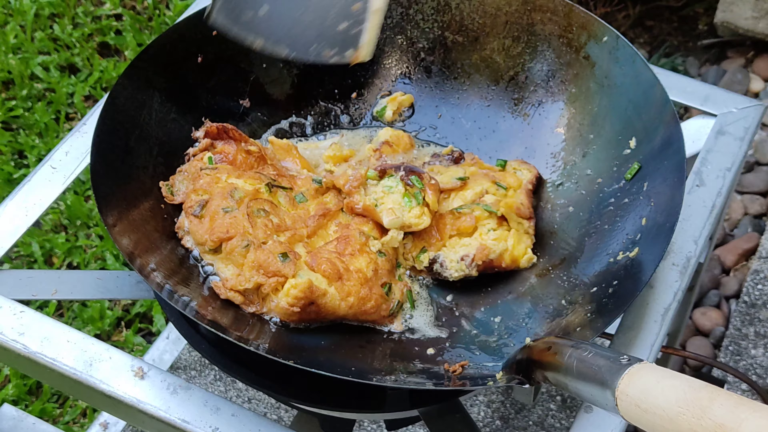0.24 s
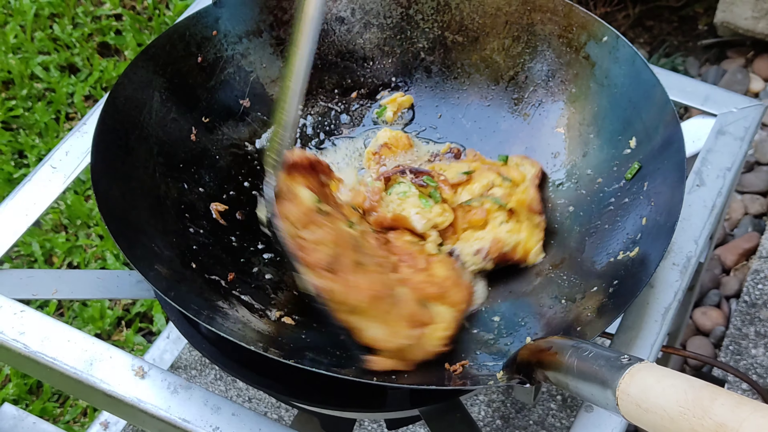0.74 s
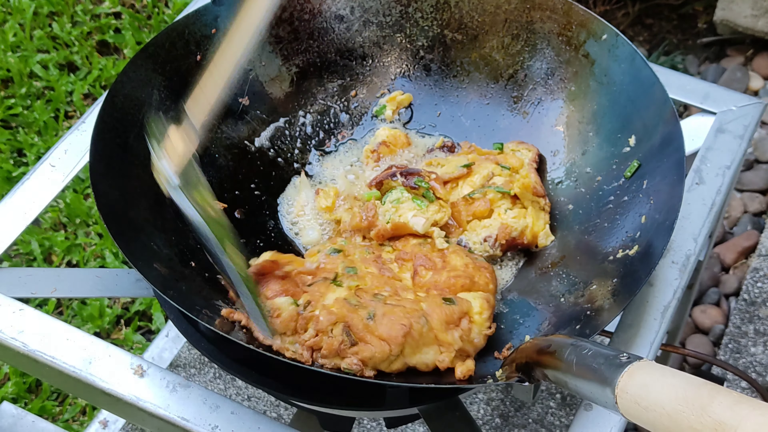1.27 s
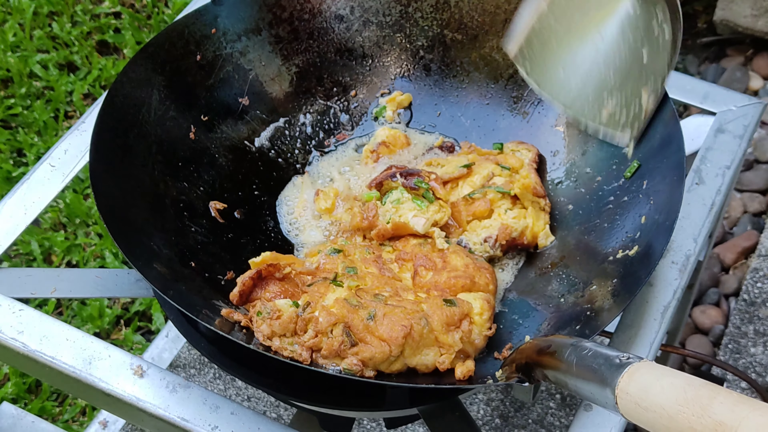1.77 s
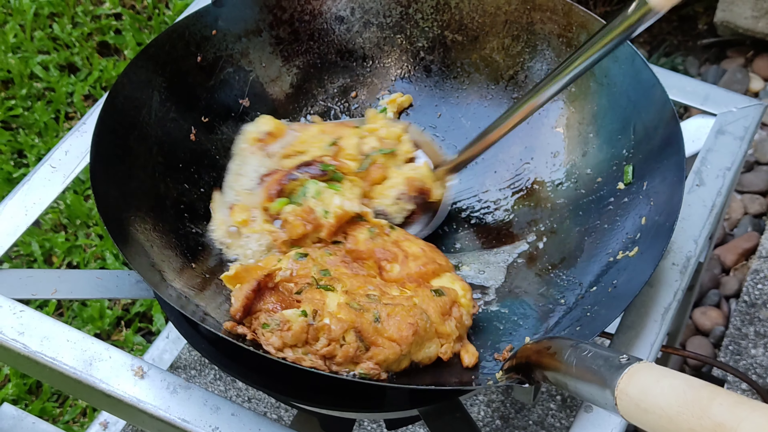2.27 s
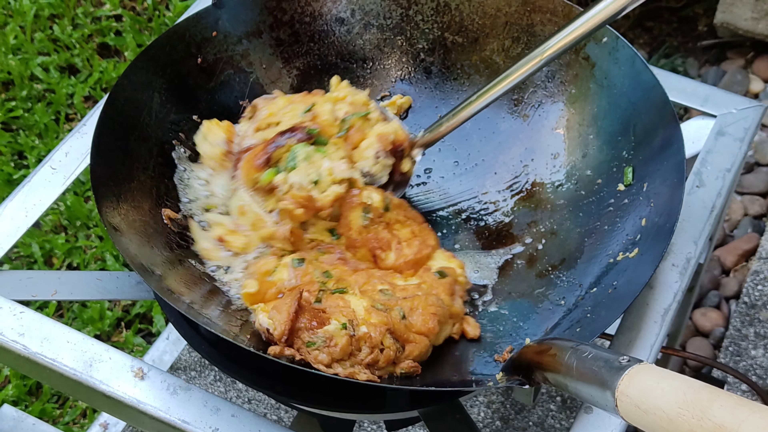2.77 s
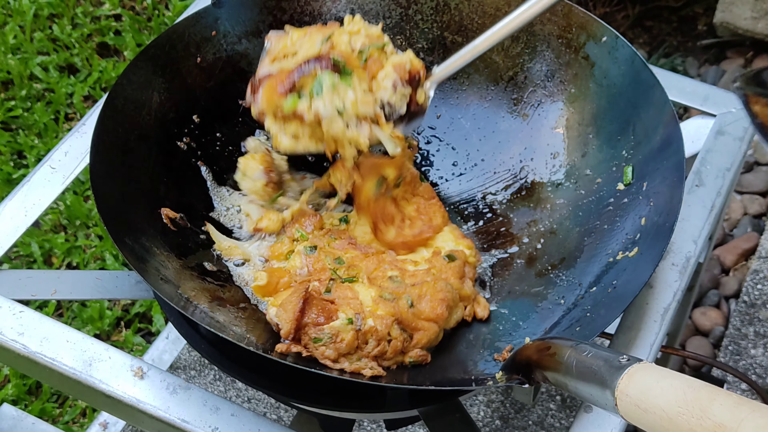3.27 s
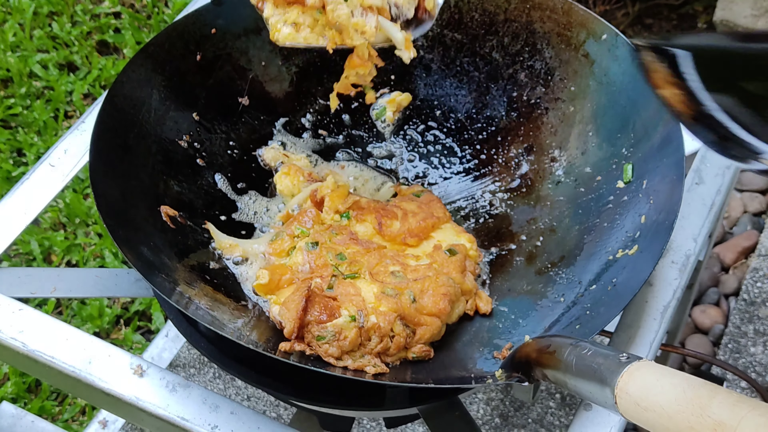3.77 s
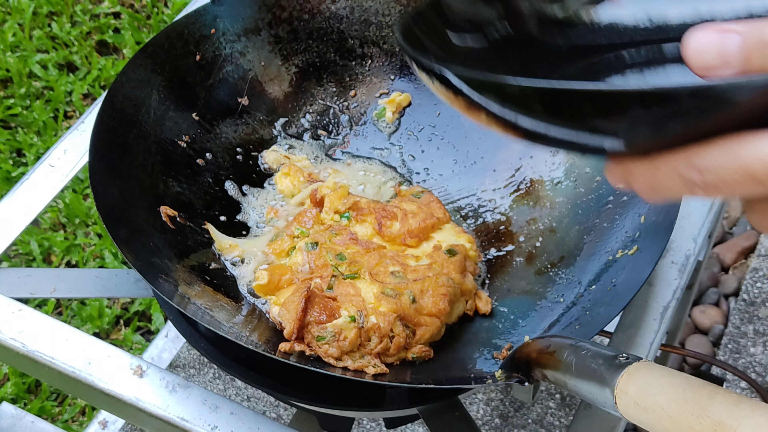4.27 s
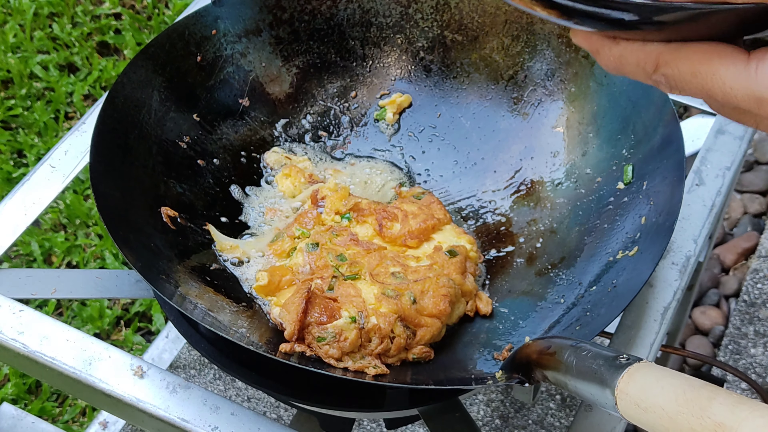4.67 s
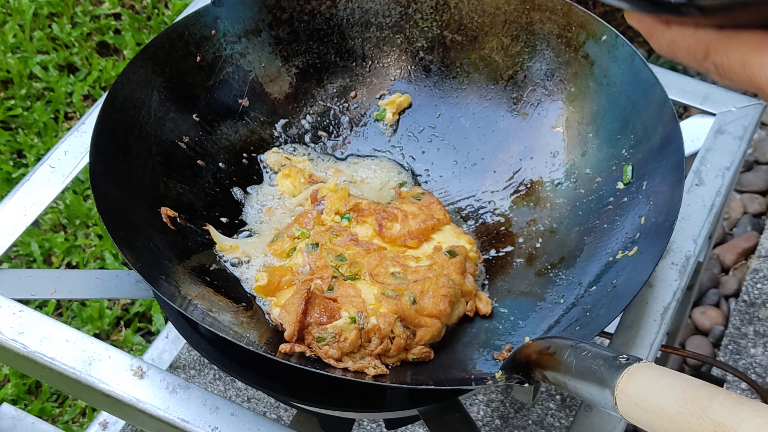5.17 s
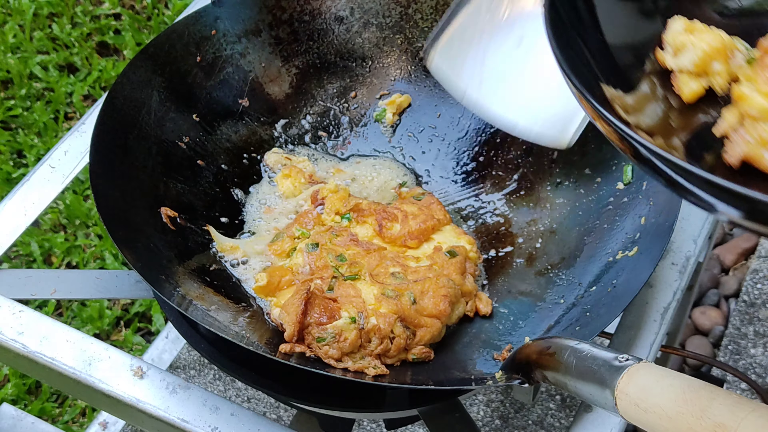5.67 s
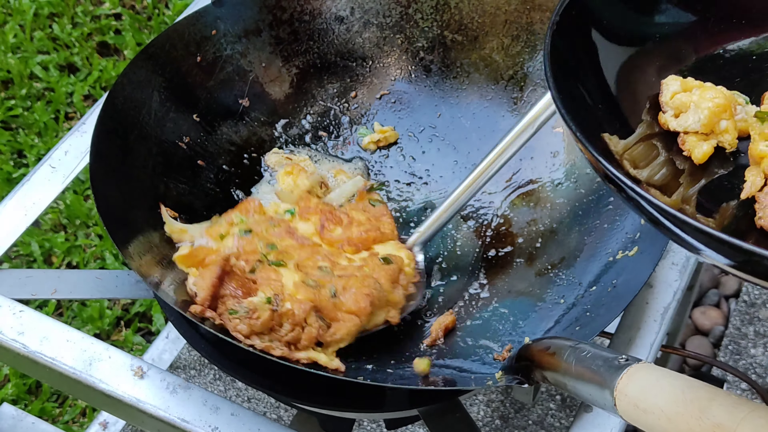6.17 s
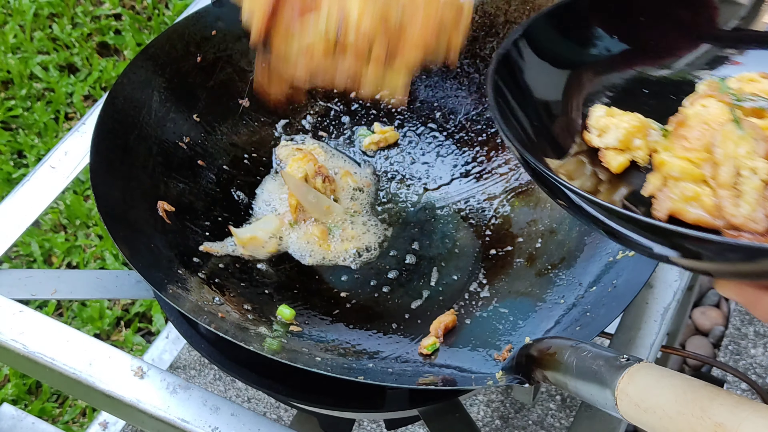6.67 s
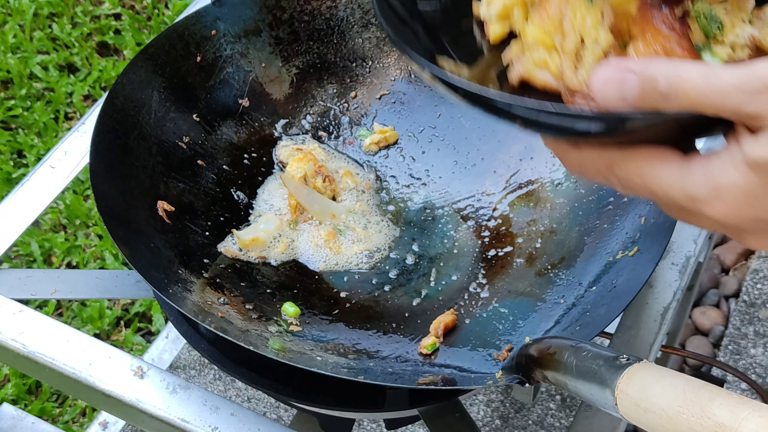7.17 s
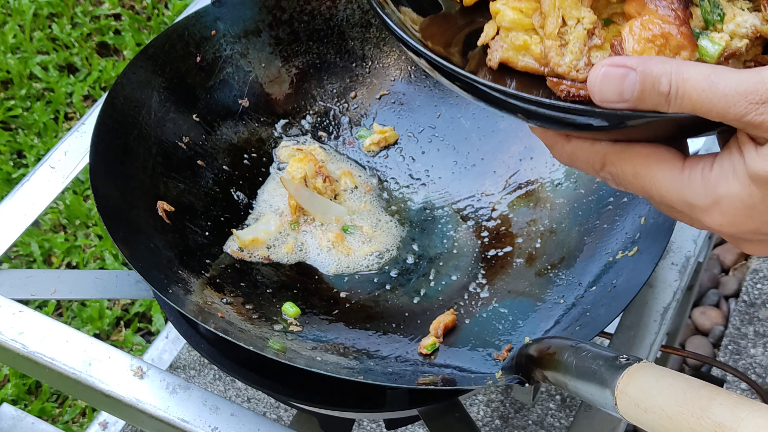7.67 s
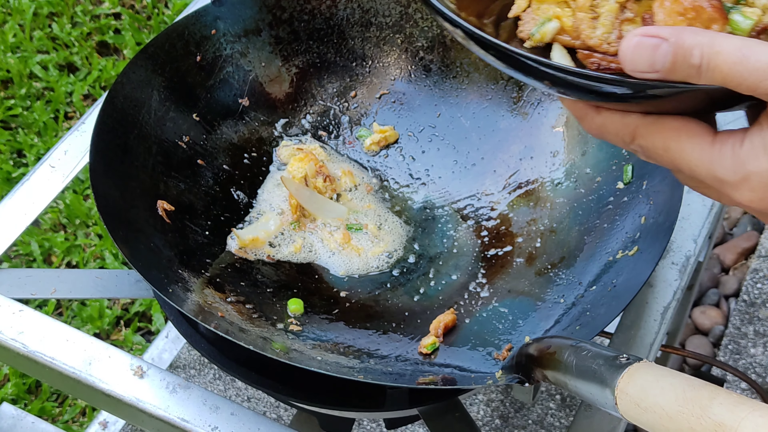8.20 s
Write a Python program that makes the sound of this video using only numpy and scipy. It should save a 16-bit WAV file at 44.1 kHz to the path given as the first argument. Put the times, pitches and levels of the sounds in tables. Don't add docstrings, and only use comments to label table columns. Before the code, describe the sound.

Bright metallic scrapes and cracks in a hollow steel wok come in bursts, separated by pauses of fine oil sizzle. Crisp pops cluster midway; a bowl is tapped twice, one tap ringing. After a distant faint chirp, the spatula clatters and scrapes again, and a final tap follows. Recorded close outdoors in stereo, with low, fluttering wind bumping the left channel, softly overloaded, and a thin, slightly dulled top end.

```python
import sys
import numpy as np
from scipy import signal
from scipy.fft import rfft, irfft, next_fast_len
from scipy.io import wavfile
from scipy.ndimage import uniform_filter1d, map_coordinates

SR = 44100
rng = np.random.default_rng(int(sys.argv[2]) if len(sys.argv) > 2 else 0)


def to_wav(s):
    ch = np.atleast_2d(s).T
    pcm = np.round(np.clip(ch, -1, 1) * 32767)
    wavfile.write(sys.argv[1], SR, pcm.astype(np.int16))


def voltage_ratio(level):
    return 10 ** (np.asarray(level, float) / 20)


N = 372200

# pitch in Hz, level in dB per Hz.
STEEL = [(710, -52), (1200, -28), (1410, -24.5), (1640, -7), (2360, -9.5), (3180, -5.5), (3770, -5),
         (5980, -4), (6510, -6), (8880, -0.5), (11500, -25.5), (12500, -18), (13600, -30), (15000, -24),
         (15600, -38)]
GRIPS = [
    0,
    1.7,
    2.37,
    4.5,
]


def unit(x):
    return x / np.sqrt(np.mean(x ** 2, axis=-1, keepdims=True) + 1e-20)


def along(points, hz):
    f, v = np.transpose(points)
    return np.interp(np.log(hz + 1), np.log(f + 1), v)


def curves(rows):
    s, *cols = np.transpose(rows)
    return [np.interp(np.arange(N) / SR, s, c) for c in cols]


def wobble(rate):
    knots = rng.standard_normal(int(N * rate / SR) + 4)
    return map_coordinates(knots, [np.arange(N) * rate / SR])


def hump(s, rise, hold, fall):
    out, corners = np.zeros(N), np.cumsum([s, rise, hold, fall])
    span = np.arange(max(int(corners[0] * SR), 0), min(int(corners[-1] * SR), N))
    out[span] = np.interp(span / SR, corners, [0, 1, 1, 0])
    return out


def filtered(x, response):
    m = next_fast_len(x.shape[-1] + 8192)
    return irfft(rfft(x, m) * response(np.fft.rfftfreq(m, 1 / SR)), m)[..., :x.shape[-1]]


def noise(spectrum, channels=1):
    white = rng.standard_normal((channels, N))
    return unit(filtered(white, lambda hz: voltage_ratio(along(spectrum, hz))))


def pan(db):
    return voltage_ratio([[db / 2], [-db / 2]])


def add(out, s, x):
    start = round(s * SR)
    x = x[..., max(-start, 0):N - start]
    first = max(start, 0)
    out[..., first:start + x.shape[-1] + max(-start, 0)] += x


def resonances(modes, hz, scatter):
    seen = 1 + scatter * rng.normal(0, 1, (len(modes), 2, 1))
    total = 0
    for k, (center, width, db) in enumerate(modes):
        peak = 1j * hz * width / (center * center - hz * hz + 1j * hz * width)
        total = total + (-1) ** k * seen[k] * voltage_ratio(db) * peak
    return total


def plate(hz, modes):
    # pitch in Hz, left over right in dB.
    edge_side = [(1300, 6), (2400, -2.5), (4400, -5), (8100, -0.5), (15000, 2)]
    delay_s = np.array([[0], [.00015]])
    late = np.exp(-2j * np.pi * hz * delay_s) * voltage_ratio(np.array([[.5], [-.5]]) * along(edge_side, hz))
    return late * (1 + voltage_ratio(1.5) * resonances(modes, hz, scatter=0.31))


def pressure(feels):
    # start in seconds, press-on in seconds, hold in seconds, edge level in dB, belly level in dB.
    strokes = [(0.55, 0.0017, 0.094, -22, -34), (0.594, 0.084, 0.012, -20.5, -48),
               (1.302, 0.061, 0.01, -50.5, -58), (1.928, 0.00085, 0.0099, -17.5, -33),
               (1.992, 0.058, 0.035, -24.5, -50), (2.077, 0.04, 0.047, -25.5, -48),
               (2.168, 0.028, 0.0046, -23.5, -52), (2.231, 0.027, 0.029, -33.5, -42),
               (2.362, 0.066, 0.042, -34.5, -37.5), (2.458, 0.043, 0.025, -44, -45),
               (2.643, 0.005, .005, -47, -43), (2.659, 0.035, 0.016, -46, -38),
               (3.068, .002, 0.015, -39.5, -43.5), (5.927, 0.002, 0.018, -31.5, -25.5),
               (5.934, 0.11, 0.075, -18.5, -39.5), (6.119, 0.077, 0.038, -24, -40),
               (6.299, 0.063, 0.059, -41.5, -44)]
    lift_s, depth_db = .14, 29
    shapes = [hump(s, rise, hold, lift_s) for s, rise, hold, *_ in strokes]
    gains = []
    for column, share in zip((3, 4), feels):
        gains.append(sum(voltage_ratio(row[column] + share * depth_db * (u - 1)) * np.minimum(u * 10, 1)
                         for row, u in zip(strokes, shapes)))
    return gains


def catching_grit():
    grit = rng.standard_normal((3, N)) * voltage_ratio(0.28 * wobble(900) + 0.95 * wobble(150) + 0.81 * wobble(50))
    grit = 0.62 * grit[0] + 1.38 * grit[1:]
    z = signal.stft(grit, SR, nperseg=1024)[2]
    field = rng.standard_normal(z.shape[1:])
    field = uniform_filter1d(uniform_filter1d(field, size=2, axis=0), size=5, axis=1)
    return signal.istft(z * voltage_ratio(3.8 * field / field.std()), SR, nperseg=1024)[1][:, :N]


def scrape():
    # pitch in Hz, width in Hz, level in dB.
    plates = [
        [(1634, 63, 4), (3000, 59, -10), (4470, 49, -9), (5600, 51, -3), (6010, 160, 0), (6760, 58, -4),
         (7240, 110, 2), (8600, 50, 4), (9850, 43.8, -2), (10500, 38, -15)],
        [(1626, 67, -5), (1942, 28, 4), (3190, 63, 0), (4560, 50, 5.5), (5740, 180, -13), (6760, 110, -5),
         (7490, 400, -6), (7960, 170, 4), (8290, 61, -9), (8820, 100, 2.5)],
        [(3100, 100, 2.5), (3700, 19.3, -8), (4320, 136, 4), (5700, 54, -12), (7100, 140, -13), (8800, 440, -4)],
        [(1610, 56.5, -6), (2670, 39.5, -7), (3200, 60, 0), (4198, 93, -18), (5860, 250, -1), (7300, 130, -8),
         (7710, 60, 1), (7850, 29, -11), (8830, 64, -11), (9050, 53, -11), (10600, 120, -14)],
    ]
    # pitch in Hz, width in Hz, level in dB.
    belly_modes = [(661, 81, 3), (970.4, 165, -5.5), (1135, 250, -2.5), (1560, 24, 2), (2640, 211, 0)]
    grit = catching_grit()
    spells = np.split(grit, np.multiply(GRIPS[1:], SR).astype(int), axis=1)
    edge = np.hstack([unit(filtered(x, lambda f: voltage_ratio(along(STEEL, f)) * plate(f, modes)))
                      for x, modes in zip(spells, plates)])

    def hollow(f):
        band = f ** 4 / (f ** 4 + 140.0 ** 4) / (1 + (f / 1900) ** 4)
        return resonances(belly_modes, f, scatter=0.29) * band

    belly = unit(filtered(grit + 0.41 * grit[::-1], hollow))
    edge_gain, belly_gain = pressure((1, 0.86))
    return edge_gain * edge + belly_gain * belly


def blade():
    # start in seconds, level in dB, time to fall 60 dB in seconds.
    landings = [(-.2, -45, 1.54), (0.552, -24.5, 0.27), (0.637, -43, 1.6), (1.37, -55.5, 0.55),
                (1.929, -34.5, 0.29), (2.101, -30.5, 0.15), (2.151, -25.5, 0.064), (2.19, -56, 0.39),
                (2.3, -50.5, 0.77), (5.925, -12, 0.2), (5.932, -24, 0.18), (5.2, -56, 0.26)]
    # pitch in Hz, level in dB, share of the ring time.
    touching = [(662, -18, .6), (1447, -5, .25), (1534, -9, .2), (1653, 0, 1), (1790, -8, .2),
                (1879, -12, .5), (2638, -18, .6)]
    # pitch in Hz, level in dB, share of the ring time.
    lifted = [(1098, -14, 1.2), (1593, -11, 1), (1653, 0, 1), (2299, -10, 1.2), (3230, -24, .8)]
    out, t = np.zeros((2, N)), np.arange(SR) / SR
    for s, db, t60 in landings:
        waver = np.cumsum(rng.normal(0, .008, len(t)))
        for hz, mode_db, share in lifted if t60 > .4 else touching:
            phase = 2 * np.pi * hz * t + rng.normal(0, 0.15, (2, 1)) + waver
            fade = voltage_ratio(db + mode_db - 60 * t / (t60 * share)) * (1 - np.exp(-t / 0.00057))
            add(out, s, fade * np.sin(phase))
    return out * voltage_ratio(1.3 * wobble(25))


def bowl_ring(t):
    # pitch in Hz, level in dB, time to fall 60 dB in seconds.
    rim = [(673, -2, .12), (1583, -8, .1), (2115, 0, .14), (3370, -3, .15), (7402, -1, .08), (8300, -7, .1),
           (8960, -6, .1)]
    ring = sum(voltage_ratio(level + rng.normal(0, 3, (2, 1)) - 60 * t / life) * np.sin(2 * np.pi * hz * t)
               for hz, level, life in rim)
    return ring * uniform_filter1d(rng.normal(0.041, 1, (2, len(t))), size=250) * 13


def contact(low_db, side_db, ring_db, crack_t60, tail_db, spot):
    # pitch in Hz, level in dB per Hz.
    thud = [(350, -40), (700, -15), (1100, 13), (1900, 3.5), (3300, -2), (6000, -47)]
    t = np.arange(SR // 3) / SR

    def color(f):
        steel_and_thud = voltage_ratio(along(STEEL, f)) + voltage_ratio(low_db + along(thud, f))
        return steel_and_thud * (1 + voltage_ratio(13.0) * resonances(spot, f, scatter=0.21))

    burst = unit(filtered(rng.standard_normal(len(t)) + 0.81 * rng.standard_normal((2, len(t))), color))
    crack = (1 - np.exp(-(t / 0.001) ** 2)) * voltage_ratio(-60 * t / crack_t60) * burst
    echo = rng.standard_normal((2, len(t)))
    tail = unit(filtered(echo, lambda f: voltage_ratio(along(STEEL, f)) * plate(f, spot)))
    tail *= voltage_ratio(tail_db - 60 * t / 0.36) + voltage_ratio(-20 - 60 * t / 0.063)
    ring = voltage_ratio(tail_db + ring_db) * bowl_ring(t)
    return pan(side_db) * (crack + (1 - np.exp(-t / 0.00022)) * (tail + ring))


def wok_blows():
    # start in seconds, peak in dB, low part in dB, left over right in dB.
    hits = [
        (0.5531, -4, -26, -0.5),
        (1.926, -8.5, -14, 2),
        (2.649, -33.5, -6, -6),
        (3.07, -21.5, -45, -4),
        (5.9245, -23, -9, -8),
        (5.9392, -15.5, -13, -5),
        (5.949, -15, -6, -8),
    ]
    # pitch in Hz, width in Hz, level in dB.
    wok_spots = [
        [(1890, 110, -2), (2710, 150, 5.5), (5640, 110, -1), (7250, 84, 4.5), (7600, 83, -13), (8800, 110, -2)],
        [(1940, 77, 4.5), (2600, 110, 4), (5650, 100, -1), (6200, 95, -2), (6800, 110, -1), (8630, 110, -4)],
    ]
    out = np.zeros((2, N))
    for s, db, low_db, side_db in hits:
        spot = wok_spots[s > GRIPS[1]]
        hit = contact(low_db, side_db, ring_db=-10.5, crack_t60=0.035, tail_db=-12, spot=spot)
        add(out, s - .001, voltage_ratio(db - 4.5) * hit)
    return out


def bowl_taps():
    # start in seconds, peak in dB, low part in dB, left over right in dB, ring over tail in dB.
    taps = [
        (3.085, -19, -37, 0, -9),
        (4.6834, -4.5, -9.5, 2, 13),
        (4.8732, -7.5, -9, -1.5, -3),
        (7.465, -6.5, -17.5, -0.5, -2),
    ]
    # pitch in Hz, width in Hz, level in dB.
    tap_spots = [
        [(2767, 33, -11), (5480, 22.6, -1), (7864, 38, 4), (8630, 81, -4), (9130, 110, -2)],
        [(658, 120, 7), (1653, 72, 5.5), (2190, 100, -3), (3270, 110, 4.5), (7420, 120, 3.5), (8720, 100, -13),
         (10830, 130, -23)],
        [(1270, 112, -12), (1944, 119, 7.5), (2240, 84, -1), (2650, 110, 7.5), (3150, 81, -12), (5300, 88, 4),
         (8300, 290, 1.5)],
        [(1077, 92, 11), (3110, 153, 4), (4340, 510, -19), (5395, 200, -6.5), (6300, 120, -25),
         (7200, 110.5, -18), (9030, 147, -11)],
    ]
    out = np.zeros((2, N))
    for (s, db, low_db, side_db, ring_db), spot in zip(taps, tap_spots):
        tap = contact(low_db, side_db, ring_db, crack_t60=0.019, tail_db=-29, spot=spot)
        add(out, s - .001, voltage_ratio(db - 4.5) * tap)
    return out


def fizz():
    # time in seconds, level in dB.
    fry = [(0, -35), (.035, -51), (.3, -54), (.5, -51), (1, -51.5), (1.6, -56), (2, -53), (2.6, -48.5),
           (3, -49), (3.3, -52.5), (3.6, -53.5), (4.5, -55.5), (5.5, -56), (6.6, -56.5), (7.6, -55),
           (8.44, -57)]
    # pitch in Hz, level in dB per Hz.
    fizz_color = [(3500, -12), (5200, -13), (6500, -6.5), (8000, -1.5), (9200, -2), (10300, -17),
                  (12500, -22), (14000, -26), (16500, -60)]
    # pitch in Hz, left over right in dB.
    fizz_side = [(5000, -1.5), (7000, -9), (8500, -5), (9600, 13.5), (12500, -4.5)]
    crowd = rng.standard_normal((2, N)) * voltage_ratio(1.8 * wobble(1500) + .7 * wobble(12))
    halves = np.array([[0.5], [-0.5]])
    bubbles = filtered(crowd, lambda hz: voltage_ratio(along(fizz_color, hz) + halves * along(fizz_side, hz)))
    return voltage_ratio(curves(np.vstack(fry))[0] + 0.5) * bubbles / bubbles.std()


def spits():
    # start in seconds, peak in
    # dB, pitch in Hz, left over right in dB.
    pops = [(0.358, -41, 8100, -16), (0.3832, -32, 8140, -4), (0.5132, -30, 9150, 3),
            (1.1034, -39, 8990, 5), (1.8345, -26, 9050, -2), (2.541, -30, 7000, -8),
            (3.1428, -42, 7910, -5), (3.1702, -34, 7900, -8), (3.2789, -34, 7710, -3),
            (3.3892, -27, 7490, -6), (3.3894, -34, 12480, 2), (3.5286, -40, 8800, 4),
            (3.6681, -41, 7120, -8), (5.263, -39, 8630, 2), (5.3526, -41, 9330, 8), (8.2122, -42, 7990, -3),
            (8.3499, -41, 7870, -1.5),
            (2.587, -35, 7780, -9), (2.61, -29, 8115, -10), (2.6177, -26.5, 8100, -9),
               (2.633, -28, 7400, -5.5), (2.65, -31, 8940, -1.5), (2.6873, -34, 7380, -4.5),
               (2.71, -23, 7310, -10), (2.7558, -20, 8620, -1), (2.769, -32, 8000, -4),
               (2.797, -29, 8500, -4), (2.94, -32, 6800, -4), (2.779, -25, 8810, -1),
               (2.7902, -27, 7300, -7), (2.821, -24, 7300, -8), (2.8444, -41, 7560, -3.5),
               (2.874, -27, 6794, -9), (2.9277, -47, 6000, -3.5), (2.928, -33, 7550, -6),
               (2.965, -24.5, 9400, -1), (3.0116, -38, 9230, -2.5)]
    out, t = np.zeros((2, N)), np.arange(SR // 20) / SR
    shape = (1 - np.exp(-t / 0.00024)) * (voltage_ratio(-60 * t / 0.0046) + voltage_ratio(-23.0 - 60 * t / 0.038))
    for s, db, hz, side_db in pops:
        pop = np.sin(2 * np.pi * hz * t + rng.normal(0, 1, (2, 1))) + 1.04 * rng.standard_normal((2, len(t)))
        top = max(10500, 1.1 * hz)
        pop = filtered(shape * pop, lambda f: f ** 4 / (f ** 4 + 5200.0 ** 4) / (1 + (f / top) ** 14))
        add(out, s - .0005, pan(side_db) * voltage_ratio(db + 5.5) * pop)
    return out


def buffeting():
    # time in seconds, strength in dB.
    strength = [(0, -23), (1.6, -23), (2.1, -26), (2.55, -22), (3.4, -25), (4.2, -27), (4.8, -30),
                (5.05, -23), (5.5, -26), (6.1, -22.5), (6.9, -27), (7.5, -22), (8.44, -25.5)]
    # deepest calm in seconds, depth in dB, dying in seconds.
    lulls = [(0.178, 5, 0.04), (.238, 10, 0.031), (.31, 5, 0.031), (.73, 6, 0.029), (1.179, 7.5, 0.034),
             (1.34, 6, 0.059), (1.925, 7, 0.04), (2.351, 6.5, 0.017), (3.333, 9, 0.043), (3.848, 6, 0.048),
             (4.21, 10, 0.042), (5.97, 9, 0.043), (7.599, 11.5, 0.076), (1.06, 6, 0.034), (1.76, 6, 0.06),
             (2.009, 7, 0.091), (2.692, 12, 0.0998), (2.976, 10.5, 0.073), (3.63, 8, 0.04),
             (4.014, 8.5, 0.076), (4.29, 8.5, 0.071), (4.514, 18, 0.17), (4.638, 18, 0.1396),
             (4.746, 8, 0.031), (5.191, 9.5, 0.12), (5.636, 12, 0.047), (6.318, 13, 0.06),
             (6.529, 17, 0.084), (6.787, 18.5, 0.1), (7.166, 25, 0.12), (7.448, 29.5, 0.11),
             (7.751, 19.5, 0.078), (7.92, 10, 0.072), (8.087, 18.5, 0.091)]
    # peak in seconds, rise in dB.
    gusts = [(0.123, 5), (.53, 3), (0.779, 4), (1.14, 5), (1.38, 3), (1.699, 5), (2.061, 4), (2.16, 3),
             (3.05, 4.5), (3.131, 5), (3.27, 7.5), (3.54, 5), (3.77, 6.5), (4.158, 8), (4.251, 4),
             (4.36, 6.5), (4.67, 8), (5.12, 5), (5.43, 3), (5.49, 5.5), (5.832, 5), (6.05, 3.5),
             (6.61, 3.5), (7.218, 7.5), (7.498, 5.5), (7.819, 7), (8.129, 10), (8.176, 4), (8.219, 8)]
    # pitch in Hz, level in dB per Hz.
    eddy_color = [(40, -45), (100, -1.5), (180, 0.5), (300, -8.5), (500, -25), (800, -43), (1300, -45),
                  (2000, -120)]
    # pitch in Hz, level in dB per Hz.
    heave_color = [(8, -40), (22, 2.5), (40, 0.5), (80, -1.5), (130, -22), (220, -11), (400, -98)]
    gust_s = .04
    strength_db = curves(strength)[0]
    lull_db = sum(db * hump(s - dying, dying, 0, .5 * dying) for s, db, dying in lulls)
    gust_db = sum(db * hump(s - gust_s, gust_s, 0, gust_s) for s, db in gusts)
    flutter_db = strength_db - lull_db + gust_db
    lumps = 1.6 * wobble(35) + 2.5 * wobble(80)
    speed = np.clip(voltage_ratio(.06 * (flutter_db + 25) + .4 * lumps + 1.2 * wobble(60)), .55, 1.6)
    flutter = map_coordinates(noise(eddy_color)[0], [np.cumsum(speed) % (N - 2)], order=1)
    flutter = voltage_ratio(flutter_db + 5.5) * unit(voltage_ratio(lumps) * flutter)
    heave_db = strength_db + 5 - 0.94 * lull_db
    heave = unit(voltage_ratio(1.3 * wobble(14) + 0.5 * lumps) * noise(heave_color)[0])
    return flutter + voltage_ratio(heave_db) * heave


def eddies():
    # start in seconds, edge level in dB.
    snaps = [(0.112, -1), (0.261, 3), (.275, -17), (0.345, -8), (.376, -5), (0.392, -4), (.471, -6.5),
             (0.972, -1.5), (1.243, 2.5), (1.419, -4.5), (1.431, -3.5), (1.585, -5), (1.593, 2),
             (1.632, -10), (1.686, -12), (1.718, -12.5), (1.823, -3), (1.833, -0.5), (1.868, -1.5),
             (1.902, -2), (2.217, 3), (2.275, 0), (2.443, -5.5), (3.456, -9), (3.52, -12.5), (3.58, -3),
             (3.95, -4), (5.821, -7.5), (5.995, -2.5), (7.278, -16), (7.291, -6.5), (7.481, 3.5),
             (7.613, 0), (7.68, -8.5), (8.321, -2), (8.4385, -7)]
    # start in seconds, body level in dB.
    puffs = [(0.319, -13.5), (0.376, -12), (0.472, -12), (0.772, -8), (0.835, -5), (0.868, -7.5),
             (1.102, -14), (1.137, -8), (1.216, -3), (1.558, -9), (2.13, -10.5), (2.414, -6), (2.503, -7.5),
             (2.751, -15), (2.812, -11.5), (3.454, -10), (3.514, -14), (3.577, -12.5), (3.642, -11.5),
             (4.048, -10), (5.048, -8.5), (5.405, -12.5), (5.89, -7), (6.223, -12.5), (6.454, -10),
             (6.69, -7), (6.95, -12.5), (7.666, -14.5), (7.787, -18.5), (8.118, -17)]
    out, t = np.zeros(N), np.arange(SR // 10) / SR
    fronts = [(s, db, db - 10) for s, db in snaps] + [(s, db - 39, db) for s, db in puffs]
    for (s, edge_db, body_db), (turn, quick) in zip(fronts, rng.random((len(fronts), 2))):
        turns = 175 * t + (300 + 150 * quick) * 0.00485 * (1 - np.exp(-t / 0.0037))
        fade = voltage_ratio(edge_db + 15.5 - 60 * t / 0.0047) + voltage_ratio(body_db - 60 * t / 0.18)
        shape = (1 - np.exp(-(t / 0.0022) ** 2)) * fade
        stumble = uniform_filter1d(uniform_filter1d(rng.standard_normal(len(t)), size=150), size=150)
        add(out, s - .001, shape * np.cos(2 * np.pi * (turns + turn + .15 * unit(stumble))))
    return out


def sheltered_air():
    # start in seconds, length in seconds, level in dB.
    veers = [(0.027, 0.61, -34), (0.71, 0.36, -30), (1.143, 0.58, -38), (1.986, 1.0, -35),
             (3.106, 0.47, -50), (3.585, 0.38, -36), (4.866, 0.29, -32), (5.201, 0.45, -35.5),
             (5.741, 0.18, -29), (6.0, 0.28, -34), (6.3, 0.43, -45), (7.09, 0.1, -23), (7.796, 0.2, -28),
             (8.123, 0.4, -33.5)]
    # pitch in Hz, level in dB per Hz.
    lee_color = [(8, -13), (30, 9), (100, -10), (200, -7), (350, -26), (700, -68)]
    reach = sum(voltage_ratio(db) * hump(s, 0.027, length, 0.075) ** 2 for s, length, db in veers)
    return voltage_ratio(-1.5) * reach * unit(voltage_ratio(2.0 * wobble(9.5) + 4.5 * wobble(38)) * noise(lee_color)[0])


def wind():
    port = filtered(buffeting() + eddies(), lambda f: 1 / (1 + (f / 1450) ** 6))
    return np.array([port, sheltered_air()])


def burner():
    # pitch in Hz, level in dB per Hz.
    roar = [(60, -5), (250, 0.5), (450, -3.5), (1000, -8), (1500, -15), (2200, -16), (3200, -24),
            (5000, -31), (8000, -43), (12000, -61)]
    return voltage_ratio(-47.5) * voltage_ratio(.8 * wobble(3)) * noise(roar, channels=2)


def bird():
    # time in seconds, pitch in Hz, level in dB.
    chirp = [
        (5.57, 3950, -90),
        (5.61, 4030, -70),
        (5.71, 4040, -69),
        (5.75, 3990, -74),
        (5.81, 4020, -90),
    ]
    hz, db = curves(chirp)
    return voltage_ratio(db + 2.6 * wobble(40)) * np.sin(2 * np.pi * np.cumsum(hz) / SR)


def scene():
    food = scrape() + blade() + wok_blows() + bowl_taps() + fizz() + spits()
    return food + wind() + burner() + bird()


def starve(x):
    # pitch in Hz, share of narrow bands lost.
    calm_loss = [(900, 0), (2500, .04), (3200, .3), (4900, .32), (5900, .06), (9300, .04), (10300, .5),
                 (11500, .6), (13000, .7), (14000, .92), (15000, .99)]
    # pitch in Hz, share of wide bands lost.
    loud_loss = [(1500, .03), (9700, .03), (10200, .5), (10700, .35), (11100, .85), (11700, .85),
                 (12200, .55), (12800, .55), (13200, .92), (13800, .85), (14300, .62), (15000, .68),
                 (15150, 1)]
    frame, grid = 1024, 733
    bins = np.arange(frame)
    hz = (bins + .5) * SR / (2 * frame)
    window = signal.get_window("cosine", 2 * frame, fftbins=False)
    angles = np.pi / frame * np.outer(np.arange(2 * frame) + (frame + 1) / 2, bins + .5)
    basis = np.cos(angles) * window[:, None] * np.sqrt(2 / frame)
    lead = 2 * frame - grid
    hops = np.pad(x, ((0, 0), (lead, 2 * frame - (N + lead) % frame))).reshape(2, -1, frame)
    z = np.concatenate([hops[:, :-1], hops[:, 1:]], axis=2) @ basis
    treble = np.sum(z[..., hz > 2000] ** 2, axis=(0, 2))[:, None]
    loud = treble > 3 * np.median(treble)
    no_attack = treble < 8 * np.roll(treble, 1)
    luck = rng.random((len(treble), frame))
    wide = luck[:, (40 * np.log(bins + 1)).astype(int)]
    narrow = luck[::2].repeat(2, axis=0)[:len(luck), bins // 4]
    luck = np.where(loud, wide, narrow)
    lost = np.where(loud, along(loud_loss, hz), along(calm_loss, hz)) * no_attack
    back = (z * (luck >= lost) / np.sqrt(np.maximum(1 - lost, .05))) @ basis.T
    joined = back[:, 1:, :frame] + back[:, :-1, frame:]
    return joined.reshape(2, -1)[:, lead - frame:lead - frame + N]


def band_limit(x):
    return signal.sosfilt(signal.butter(12, 16410, fs=SR, output="sos"), x)


def record(dry):
    loud = dry / (1 + np.abs(dry / 0.65) ** 6) ** (1 / 6)
    narrow = filtered(loud, lambda hz: 1 / (1 + (hz / 15800) ** 40))
    return band_limit(starve(narrow))


dry = scene()
out = record(dry)
to_wav(out)
```